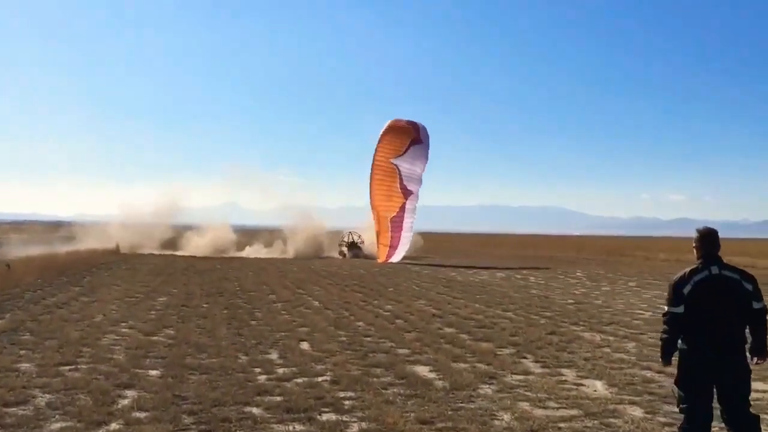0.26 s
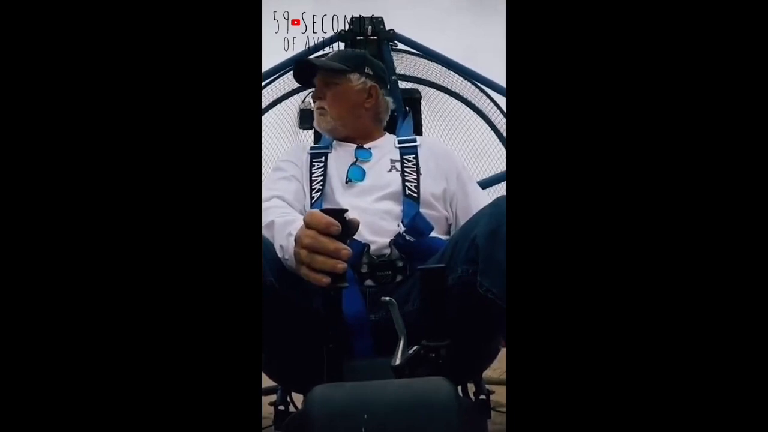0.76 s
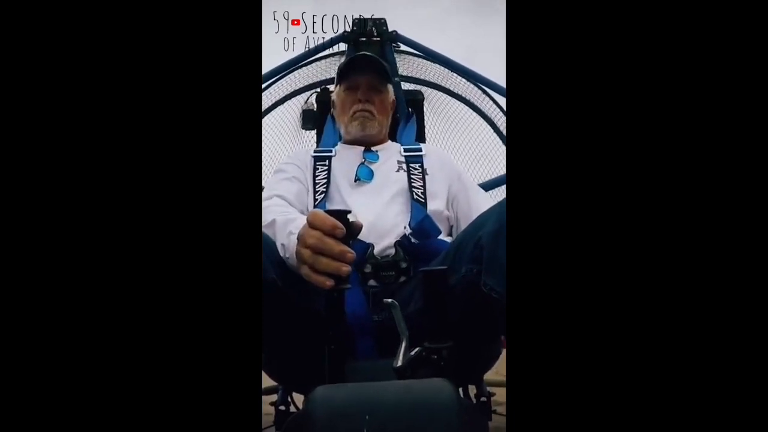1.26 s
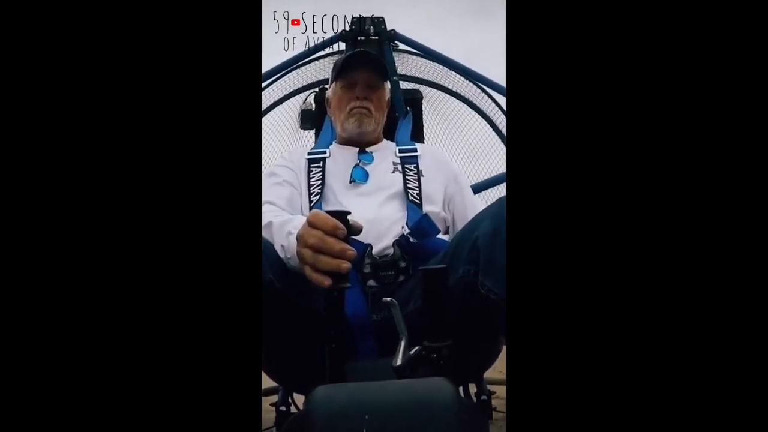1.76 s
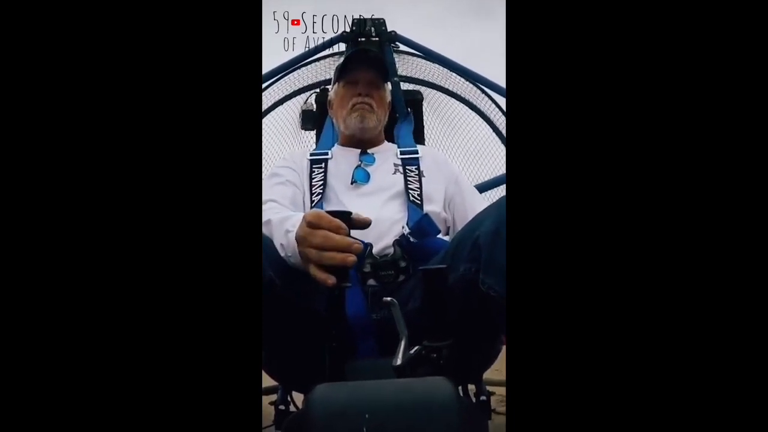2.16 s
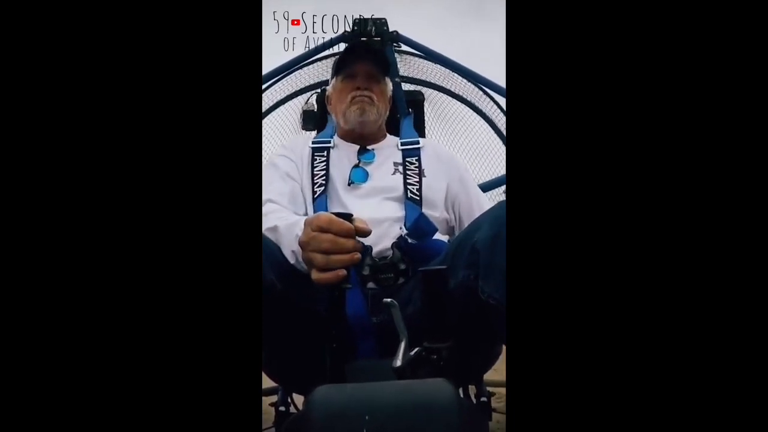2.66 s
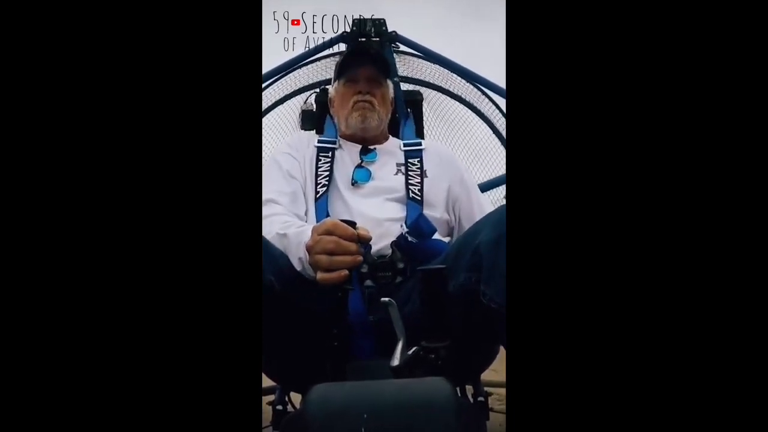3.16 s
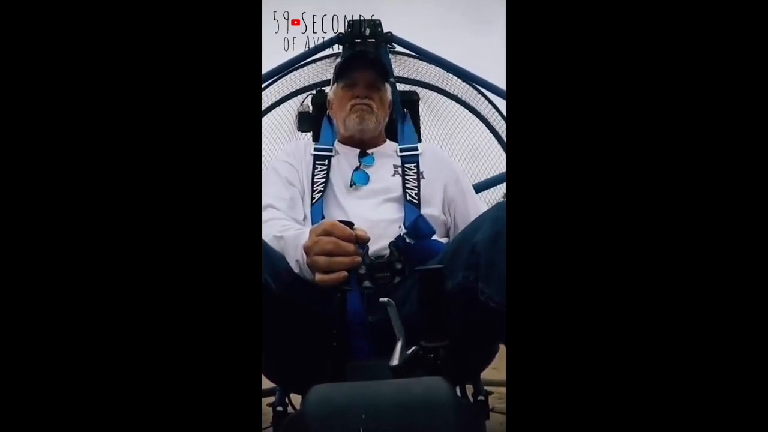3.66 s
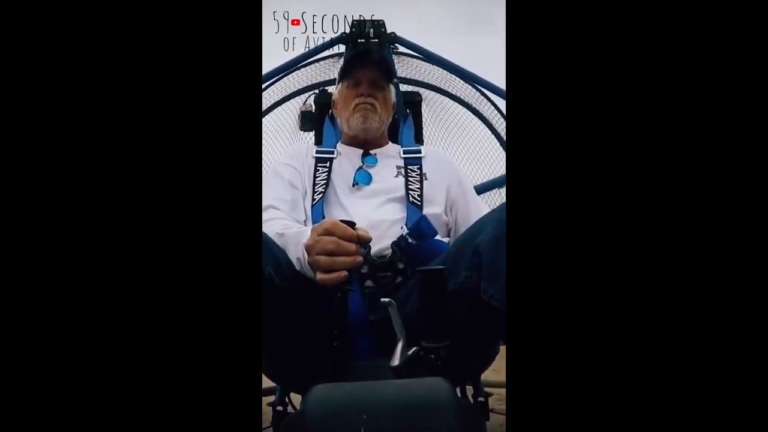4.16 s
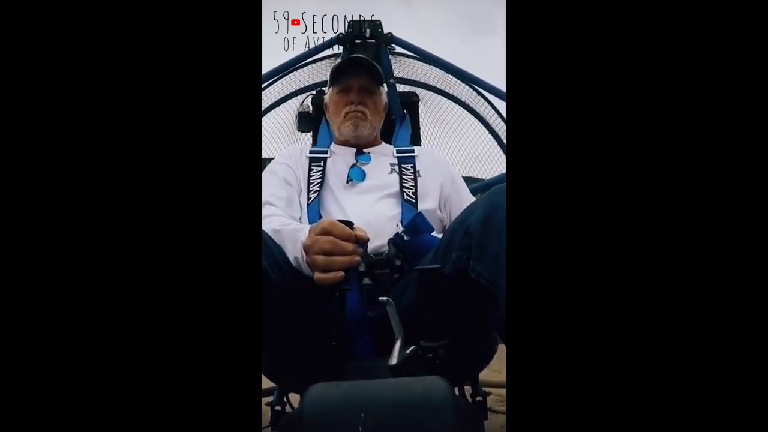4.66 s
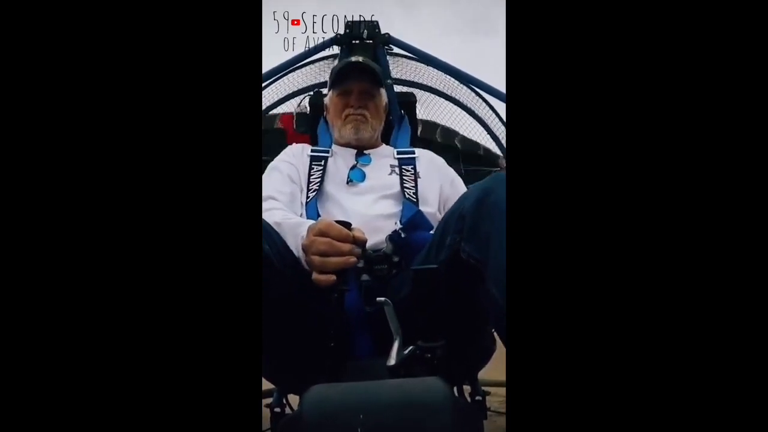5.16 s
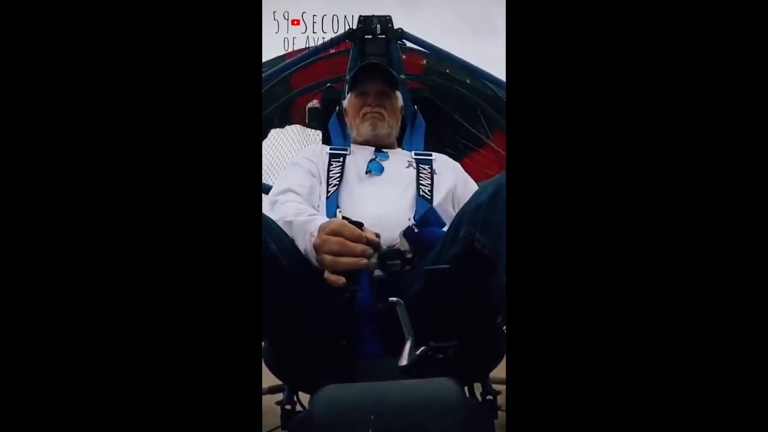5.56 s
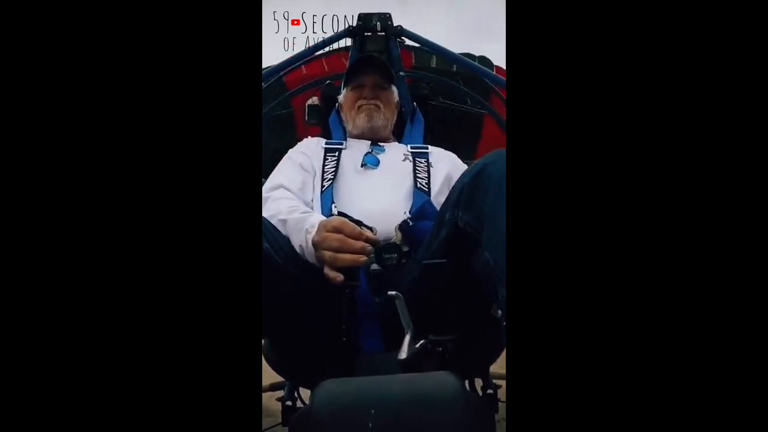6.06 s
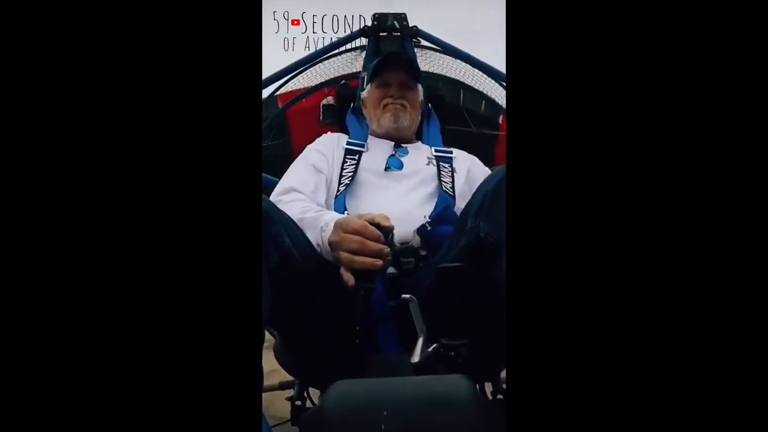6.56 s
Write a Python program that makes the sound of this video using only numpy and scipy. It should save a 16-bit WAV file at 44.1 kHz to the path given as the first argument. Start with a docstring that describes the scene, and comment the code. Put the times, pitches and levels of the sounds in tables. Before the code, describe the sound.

A powered parachute drones faintly far away, then suddenly its engine and propeller are loud and close, revving up slightly midway.

```python
"""A powered parachute drones faintly, far across a field; at 0.43 s a hard cut puts us in the pilot's seat.
A two-stroke engine turns a geared three-blade propeller: exhaust buzz and blade tones beat over a bed of
buffeting air, the casing clatters, loose metal rings, the blades hiss. Near 1.8 s the engine is at its
slowest and the silencer booms. Near 3 s the throttle opens a little, and from there to the end the fourth
crankshaft order sings on a resonance of the exhaust pipe."""
import sys
import numpy as np
from scipy import signal
from scipy.fft import rfft, irfft, next_fast_len
from scipy.io import wavfile
from scipy.ndimage import uniform_filter1d, minimum_filter1d

SR = 44100
rng = np.random.default_rng(int(sys.argv[2]) if len(sys.argv) > 2 else 0)


def materialize(psi):
    """Save the field psi as 16-bit PCM at rate SR to the path in sys.argv[1].

    A 1-D psi becomes a single channel; in a 2-D psi each row is a channel.
    """
    bounded = np.clip(np.atleast_2d(psi).T, -1, 1)
    quanta = np.round(bounded * 32767).astype(np.int16)
    wavfile.write(sys.argv[1], SR, quanta)


N = 299439
TIME = np.arange(N) / SR
BLADES, GEAR_RATIO = 3, 2.58  # the ratio is crankshaft turns per propeller turn

# fader rides of casing and blades, before their trims: t/s, clatter level/dB, hiss level/dB
MACHINE_RIDES = [(0.43, -21.5, -27), (1.63, -22.5, -28), (1.83, -22, -28), (2.8, -22, -26.5),
                 (3.1, -19.5, -25.5), (3.87, -22.5, -26), (5.87, -22, -27), (6.78, -25.5, -27.5)]


def exhaust(crank, crank_hz, boom):
    """Crankshaft orders buzz, shifting balance with speed; the fourth sings on the pipe's resonance."""
    # one row per order from 2 up: cruise level/dB, open-throttle level/dB, rise in the boom/dB
    order_mix = [(-24, -34, 3.5), (-31.5, -35.5, 4), (-56, -59, -0.5), (-35.5, -44.5, 5.5), (-46.5, -50, 2),
                 (-38, -47.5, 3.5), (-40, -46, 11), (-59, -54.5, 2), (-64, -52, 3.5), (-44.5, -50.5, 3.5),
                 (-42.5, -42.5, 0.5), (-57, -44.5, 1), (-46.5, -48, 8)]
    # the buzz builds towards the boom and sags before the throttle opens: t/s, gain/dB
    buzz_ride = [(.43, -3), (1.0, -2), (1.35, 1), (1.9, 1), (2.4, -1), (2.9, 0), (3.5, 3.5)]
    # the singing tone swells and sags: t/s, gain/dB
    sing_ride = [(0.43, 2.5), (1.7, -1), (2.2, 4.5), (2.5, 1), (2.72, -13), (2.95, -1), (3.2, 4), (3.5, 0),
                 (3.8, 2.5), (4.1, -1), (4.9, -0.5), (5.4, 1.4), (6.03, -3.3), (6.35, 1.5), (6.79, -0.5)]
    buzz_db, = curves(buzz_ride)
    swell_db, = curves(sing_ride)
    open_share = np.clip((crank_hz - 99.4) / 2.6, 0, 1)  # crossfade from 99.4 to 102 Hz
    buzz = 0
    for order, (cruise_db, open_db, rise_db) in enumerate(order_mix, 2):
        level_db = cruise_db + open_share * (open_db - cruise_db) + boom * rise_db
        buzz += gain_of(level_db) * tone(order * crank, rough=.15, rate_hz=14)
    pipe = gain_of(-18) * nearness(crank_hz, centre_hz=103.26, width_hz=1.63) + gain_of(-41) * boom
    sing = pipe * tone(4 * crank, rough=.06, rate_hz=6)
    return gain_of(buzz_db) * buzz + gain_of(swell_db) * sing


def roar(crank, throttle, boom):
    """Gas leaves the silencer in two puffs a turn: a low growl that comes in swells, a roar above it."""
    # EQ of the silencer's growl: f/Hz, level/dB
    growl_eq = [(110, -10.5), (168, -2.5), (181, 5.5), (191, -2.5), (205, -4.5), (218, 2.5), (232, -4),
                (252, -11), (275, -3), (305, -8.5), (450, -50)]
    # EQ of the roar at cruise: f/Hz, level/dB
    cruise_eq = [(200, -43), (310, -14), (365, -11), (440, -10), (480, -13), (540, -17), (640, -13),
                 (820, -11), (940, -24), (1400, -46.5), (3000, -80)]
    # EQ of the roar with the throttle open: f/Hz, level/dB
    open_eq = [(200, -22), (280, -15.5), (310, -14.5), (345, -6.5), (363, -2), (382, -7.5), (440, -8.5),
               (470, -12.5), (488, -5.5), (504, -13), (560, -18.5), (635, -11.5), (700, -22.5),
               (840, -12.5), (920, -25), (1400, -32.5), (3000, -81)]
    # shape of the swells, scaled about its mean: t/s, level/dB
    swell_shape = [(0.43, -17), (1.65, -14.5), (2.0, -21.5), (2.27, -13.5), (2.57, -19.5), (2.85, -14),
                   (3.25, -23.5), (3.65, -26.5), (4.3, -20.5), (4.65, -20), (5.0, -17), (5.5, -27),
                   (5.85, -17.5), (6.4, -24.5), (6.79, -28)]
    # the roar eases at the end: t/s, gain/dB
    roar_ride = [(.43, 0), (2.0, 1), (2.6, -0.5), (3.4, 0), (5.0, -0.5), (6.0, 0), (6.79, -2)]
    roar_db, = curves(roar_ride)
    swell, = curves(swell_shape)
    swell -= swell.mean()
    puffs = 1 + .24 * np.cos(2 * np.pi * 2 * crank)
    growl = gain_of(-26 + 2 * throttle + 1.21 * swell) * noise(growl_eq, puffs)
    cruise = gain_of(-29.5 + 3 * boom) * noise(cruise_eq, puffs)
    opened = gain_of(-24.5 + .13 * swell) * noise(open_eq, puffs)
    return growl + gain_of(roar_db) * (np.sqrt(1 - throttle) * cruise + np.sqrt(throttle) * opened)


def throb(crank, prop):
    """Crankshaft shake and propeller pressure waves beat against each other in the buffeting air."""
    # low tones before their trims: t/s, shake level/dB, propeller order 2 level/dB, blade-pass level/dB
    low_rides = [(0.46, -20, -22, -9), (0.73, -18, -13, -22.5), (0.82, -12.5, -17, -32),
                 (0.94, -30, -16, -7.5), (1.27, -18, -26, -18), (1.33, -30, -21.0, -3.5),
                 (1.45, -13, -21, -29), (1.66, -22, -17, -15), (2.14, -20, -19, -10.5),
                 (2.32, -17, -21, -40), (2.41, -25, -18, -6.5), (2.71, -24, -22, -13),
                 (2.98, -18.5, -20, -23), (3.07, -31, -16, -9), (3.22, -16, -13, -19),
                 (3.37, -18, -21, -8.5), (3.73, -24, -17, -14), (3.88, -15, -17.5, -10.5),
                 (4.0, -9, -32, -14), (4.12, -25, -13, -12.5), (4.33, -14, -23, -16.5),
                 (4.57, -25, -19, -10.5), (4.93, -15, -20.5, -19), (5.17, -17, -19, -17.5),
                 (5.32, -29, -18, -12), (5.59, -15, -14.5, -18), (5.71, -24, -24, -13.5),
                 (6.1, -30, -23.5, -11.5), (6.25, -8, -35, -22), (6.46, -12, -22, -12.5),
                 (6.58, -32, -19, -17), (6.73, -20, -15, -13)]
    # EQ of the buffeting air: f/Hz, level/dB
    rumble_eq = [(15, -31), (28, -27.5), (43, -5), (70, -5), (95, 4.5), (128, 3), (145, -2.5), (170, -18),
                 (300, -23.5), (900, -82)]
    shake_db, second_db, blade_db = curves(low_rides)
    shake = gain_of(shake_db + .8) * tone(crank, rough=.15, rate_hz=6)
    second = gain_of(second_db + 1.5) * tone(2 * prop, rough=.43, rate_hz=4.4)
    blade = gain_of(blade_db + 1.07) * tone(BLADES * prop, rough=.25, rate_hz=12)
    return shake + second + blade + gain_of(-16) * noise(rumble_eq)


def blade_overtones(prop):
    """The blades cut the wake of pilot and frame, so their upper tones flutter and swell."""
    # blade-pass harmonics: t/s, second level/dB, third level/dB, fourth level/dB
    harmonic_rides = [(.43, -25.5, -38, -35.5), (1.5, -42.5, -46, -32.5), (2.0, -26, -41, -49),
                      (3.1, -28.5, -31, -55), (3.4, -40, -40, -25.5), (3.95, -38, -26.5, -33.5),
                      (4.25, -33, -44, -31.5), (4.6, -37, -26, -27), (5.2, -32.5, -37, -32),
                      (5.7, -27, -29, -38), (6.2, -29.5, -32.5, -40), (6.79, -38, -29, -43)]
    return sum(gain_of(level_db) * tone(harmonic * BLADES * prop, rough=.45, rate_hz=11)
               for harmonic, level_db in enumerate(curves(harmonic_rides), 2))


def casing_clatter(crank, prop):
    """Each firing shakes the casing with its own force; the passing blades chop the sound."""
    # EQ of the engine casing: f/Hz, level/dB
    casing_eq = [(500, -63), (950, -15), (1120, -9), (1240, -5.5), (1490, -4.5), (1590, 2.5), (1740, 0),
                 (1860, -4.5), (2100, -6.5), (2280, -13), (2400, -17.5), (2650, -25.5), (4000, -72)]
    level_db, _ = curves(MACHINE_RIDES)
    firing_db = .58 * np.cos(2 * np.pi * 2 * crank) + drift(70)
    chop_db = .67 * np.cos(2 * np.pi * BLADES * prop)
    return gain_of(level_db - 1.37) * noise(casing_eq, gain_of(firing_db + chop_db))


def metal_ring(crank, crank_hz):
    """Loose metal rings at a wandering pitch and favours the engine orders that fall nearest to it."""
    # resonance of the metal part: t/s, f/Hz
    ring_pitch = [(.43, 1825), (1.0, 1890), (1.5, 1870), (2.0, 1875), (2.8, 1860), (3.2, 1850), (3.7, 1850),
                  (4.3, 1784), (5.0, 1870), (5.5, 1840), (5.85, 1800), (6.2, 1790), (6.79, 1880)]
    # shape of its swells, scaled about its mean: t/s, level/dB
    swell_shape = [(0.43, -27), (1.15, -22), (1.3, -21.5), (1.55, -20.5), (1.7, -25.5), (1.87, -20),
                   (2.07, -21.5), (2.8, -19.5), (3.14, -23.5), (4.05, -26), (4.27, -20.5), (4.55, -24.5),
                   (4.8, -23), (5.0, -20.5), (5.25, -23), (5.55, -24), (5.78, -21.5), (6.11, -22),
                   (6.35, -29), (6.6, -22.5), (6.78, -28)]
    ring_hz, = curves(ring_pitch)
    swell, = curves(swell_shape)
    pitched = 0
    for order in range(17, 22):
        drive = nearness(order * crank_hz, ring_hz, width_hz=130)
        pitched += drive * tone(order * crank, rough=.7, rate_hz=5.4)
    rattle = rng.standard_normal(N)
    for _ in range(3):  # three passes steepen the skirts
        rattle = resonate(rattle, ring_hz, width_hz=286)
    level_db = -28.5 + 1.28 * (swell - swell.mean())
    return gain_of(level_db) * (gain_of(-4) * unit_rms(pitched) + unit_rms(rattle))


def blade_hiss(prop):
    """Turbulence from the blades, surging as each one passes."""
    # EQ of the hiss: f/Hz, level/dB
    hiss_eq = [(1500, -36.5), (2650, -14), (2850, -5.5), (3500, -1), (3780, 2.5), (4020, -2.5), (4500, 3.5),
               (5100, -4.5), (6000, -3), (6900, -8), (8000, -8.5), (8750, -17.5), (9400, -16),
               (10300, -41.5), (11200, -65)]
    _, level_db = curves(MACHINE_RIDES)
    angle = 2 * np.pi * BLADES * prop
    surge_db = 1.64 * np.cos(angle) + .76 * np.cos(2 * angle) + .62 * drift(60)
    return gain_of(level_db - 3) * noise(hiss_eq, gain_of(surge_db))


def whines(crank, throttle):
    """Faint high tones of the engine's moving parts stand out of the hiss."""
    # whines before their trim: crankshaft order, cruise level/dB, open-throttle level/dB
    whine_mix = [(22, -53, -45), (23, -45, -56), (28, -52, -58), (29, -53, -60), (46, -42, -55)]
    mix = 0
    for order, cruise_db, open_db in whine_mix:
        level_db = cruise_db + throttle * (open_db - cruise_db)
        mix += gain_of(level_db - 3.5) * tone(order * crank, rough=.76, rate_hz=8)
    return mix


def fizz():
    """A thin fizz at the very top comes and goes."""
    # EQ of the fizz: f/Hz, level/dB
    fizz_eq = [(11600, -40), (12400, 0), (13300, -3.5), (14200, -5), (14700, -31)]
    # its fader ride: t/s, level/dB
    fizz_ride = [(0.43, -60), (1.9, -52.5), (2.2, -56), (2.35, -98), (4.1, -87), (4.4, -60), (4.8, -50),
                 (5.2, -67), (5.85, -51), (6.1, -62), (6.25, -83)]
    level_db, = curves(fizz_ride)
    return gain_of(level_db) * noise(fizz_eq)


def far_field():
    """The far machine, smeared by distance, fades as it draws away; a low breeze picks up."""
    # EQ of the far drone: f/Hz, level/dB
    drone_eq = [(80, -19), (140, -5), (220, 1.5), (310, -3), (420, -5), (600, -12), (780, -19)]
    # EQ of the rasp above it: f/Hz, level/dB
    rasp_eq = [(350, -30), (580, -12), (780, -15), (1000, -13), (1900, -16), (2350, -20), (2880, -34),
               (3200, -22), (3700, -22.5), (4400, -29), (5050, -38), (5750, -29), (6600, -32), (7400, -42),
               (8700, -38.5), (10500, -45), (14000, -58)]
    # EQ of the breeze: f/Hz, level/dB
    breeze_eq = [(15, -30), (28, -16), (44, -6), (70, -6), (110, -7), (170, -14), (600, -48)]
    # fader rides on the field: t/s, drone level/dB, rasp level/dB, breeze level/dB
    field_rides = [(0.0, -34.5, -39.5, -52), (0.07, -37.5, -44.5, -47), (0.22, -43.5, -47.5, -42),
                   (0.29, -45.5, -46.5, -41.5), (0.4, -49, -47, -42)]
    layers = zip(curves(field_rides), (drone_eq, rasp_eq, breeze_eq))
    return sum(gain_of(level_db) * noise(eq) for level_db, eq in layers)


def tone(turns, rough, rate_hz):
    """A tone of rms 1; turbulence scatters the rough share into a narrow skirt."""
    flutter = 1 + rough * (drift(rate_hz) + 1j * drift(rate_hz))
    carrier = np.exp(2j * np.pi * (turns + rng.random()))
    return unit_rms((flutter * carrier).real)


def noise(eq, pulse=1):
    """White noise times pulse, through an EQ curve that falls steeply above its last point; rms 1."""
    hz, db = np.transpose(eq)
    size = next_fast_len(N)
    bins = np.fft.rfftfreq(size, 1 / SR)
    skirt = np.maximum(bins / hz[-1], 1) ** -4
    gain = skirt * gain_of(np.interp(np.log(bins + 1), np.log(hz), db))
    spectrum = rfft(pulse * rng.standard_normal(N), size)
    return unit_rms(irfft(spectrum * gain, size)[:N])


def drift(rate_hz):
    """A smooth random wobble of rms 1 that moves at up to about rate_hz."""
    white = rng.standard_normal(8192)
    bins = np.fft.rfftfreq(len(white), TIME[-1] / len(white))
    slow = irfft(rfft(white) / (1 + (bins / rate_hz) ** 2))
    return unit_rms(np.interp(TIME, np.linspace(0, TIME[-1], len(slow)), slow))


def resonate(x, hz, width_hz):
    """A swept resonance of gain 1 that follows the curve hz."""
    turn = np.exp(2j * np.pi * np.cumsum(hz) / SR)
    pole = np.exp(-np.pi * width_hz / SR)
    return 2 * (turn * signal.lfilter([1 - pole], [1, -pole], x / turn)).real


def nearness(hz, centre_hz, width_hz):
    """1 right on a resonance, one half at width_hz to either side."""
    return 1 / (1 + ((hz - centre_hz) / width_hz) ** 2)


def curves(rows):
    """One automation curve for each column after a table's times."""
    times, *columns = np.transpose(rows)
    return [np.interp(TIME, times, column) for column in columns]


def gain_of(db):
    """Decibels to amplitude."""
    return 10 ** (np.asarray(db) / 20)


def unit_rms(x):
    """Scales to rms 1."""
    return x / np.sqrt(np.mean(x ** 2) + 1e-20)


def scene():
    """The field, then a hard cut to the seat, where one crankshaft drives engine and propeller."""
    # crankshaft speed: t/s, f/Hz
    engine_speed = [(.43, 98.7), (.72, 99), (1.45, 98.8), (1.78, 98.3), (2.15, 99.5), (2.45, 99.85),
                    (2.8, 101), (3.05, 101.5), (3.42, 104.1), (3.85, 104.5), (4.25, 103.8), (5, 103.25),
                    (5.5, 102.7), (5.78, 103.15), (5.97, 103), (6.3, 103.6), (6.79, 103.55)]
    crank_hz, = curves(engine_speed)
    crank = np.cumsum(crank_hz * (1 + .00076 * drift(4.9))) / SR  # angle in turns
    prop = crank / GEAR_RATIO
    throttle = np.clip((crank_hz - 101.7) / 1.6, 0, 1)  # 0 at cruise, 1 once the speed has risen
    boom = nearness(crank_hz, centre_hz=98.01, width_hz=.9)  # the silencer booms at the slowest speed
    engine = exhaust(crank, crank_hz, boom) + roar(crank, throttle, boom)
    mechanics = casing_clatter(crank, prop) + metal_ring(crank, crank_hz) + whines(crank, throttle)
    propeller = blade_overtones(prop) + blade_hiss(prop)
    top_end = fizz()
    field = far_field()
    seat = engine + mechanics + propeller + top_end + throb(crank, prop)
    aboard = np.clip((TIME - .4275) / .001, 0, 1)
    return ((1 - aboard) * field + aboard * seat)[None]


def record(dry):
    """A compressor steadies the heavy bass, a fast limiter holds the crests, a low-pass trims the top."""
    bass_hz, threshold_db, squeeze = 169, -12.5, .81  # squeeze: share of the excess removed
    ceiling, top_hz = .92, 15250
    bass = signal.sosfiltfilt(signal.butter(2, bass_hz, fs=SR, output="sos"), dry)
    power = uniform_filter1d(uniform_filter1d(bass ** 2, size=900), size=600)
    over_db = np.maximum(10 * np.log10(abs(power) + 1e-12) - threshold_db, 0)
    steady = dry + bass * (gain_of(-squeeze * over_db) - 1)
    safe_gain = np.minimum(1, ceiling / (abs(steady) + 1e-9))
    limited = steady * uniform_filter1d(minimum_filter1d(safe_gain, size=400), size=400)
    low_pass = signal.firwin(511, top_hz, window=("kaiser", 9), fs=SR)
    fade_out = np.clip((TIME[-1] - TIME) / .003, 0, 1)
    return signal.oaconvolve(limited * fade_out, low_pass[None], "same")


dry = scene()
out = record(dry)
materialize(out)
```